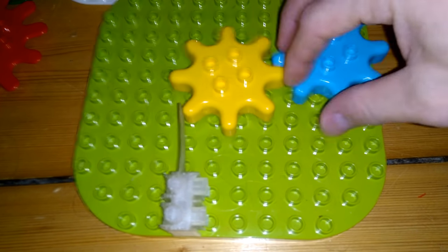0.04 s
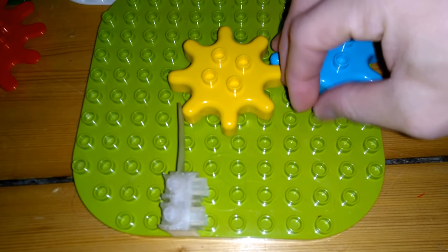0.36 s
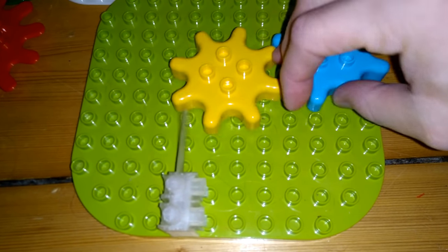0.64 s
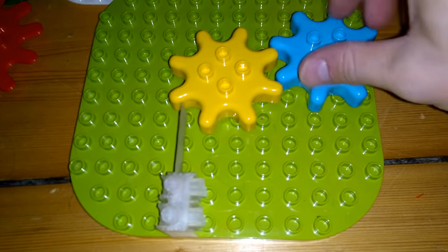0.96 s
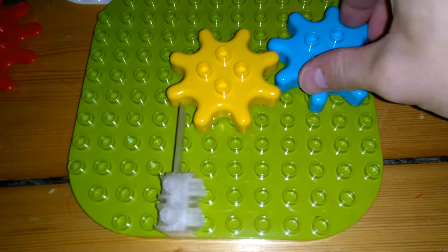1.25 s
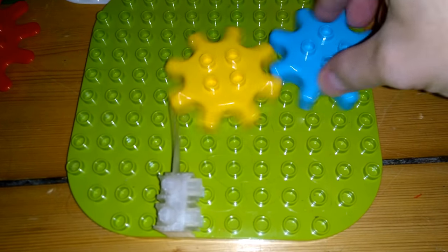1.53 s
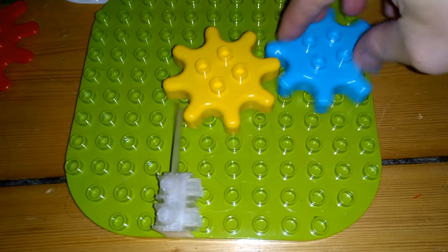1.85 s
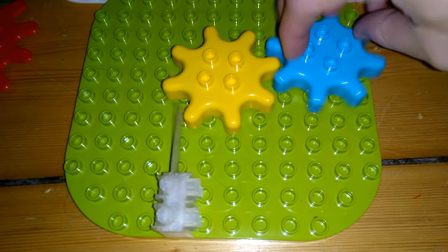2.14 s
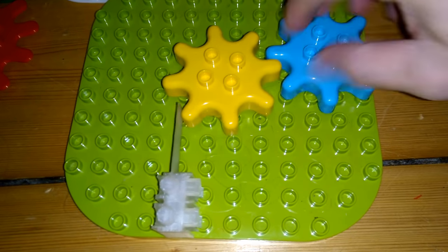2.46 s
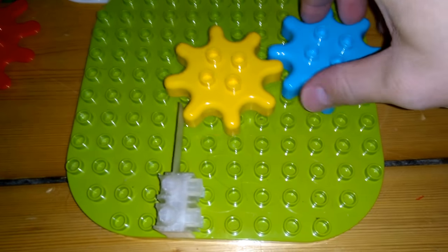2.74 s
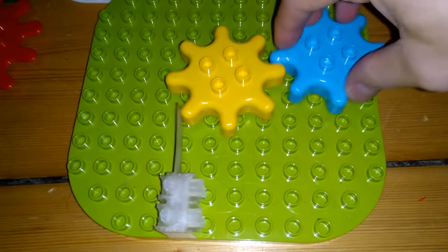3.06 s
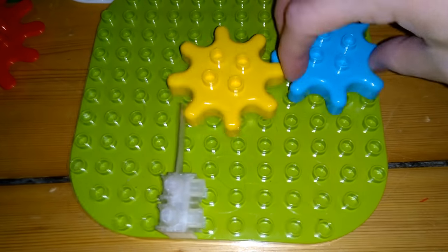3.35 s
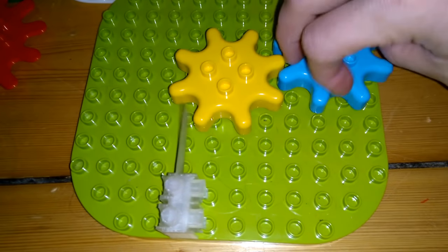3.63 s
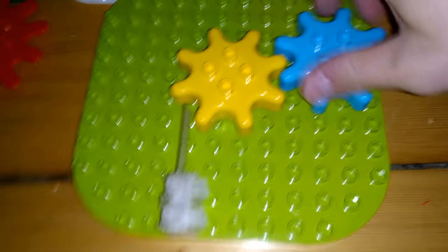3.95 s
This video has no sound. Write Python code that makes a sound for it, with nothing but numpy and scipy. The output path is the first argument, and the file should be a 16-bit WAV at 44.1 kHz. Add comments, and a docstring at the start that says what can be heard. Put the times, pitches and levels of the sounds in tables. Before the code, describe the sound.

Sharp clicks and clacks of hand-turned plastic gears, with a briefly buzzing plastic strip.

```python
"""A hand turns two hollow plastic toy gears on a base plate, close by in a small room.
At once three passing teeth each bend a thin plastic strip, which slips off and hums; each time the freed
gear clacks through its play in a burst of quick contacts. From 0.8 s fingers knock, tap and rub the
gears while loose teeth tick. Three more teeth pass from 1.6 s, the fingers knock again near 2.7 s,
and a last turn of three teeth starts at 3 s."""
import sys
import numpy as np
from scipy import signal
from scipy.fft import rfft, irfft, next_fast_len
from scipy.io import wavfile
from scipy.ndimage import uniform_filter1d, map_coordinates

SR = 44100
rng = np.random.default_rng(int(sys.argv[2]) if len(sys.argv) > 2 else 0)


def unload_wav(signal):
    """Save mono or channel-first audio to the path in sys.argv[1] as 16-bit WAV at rate SR, clipped to [-1, 1]."""
    wavfile.write(
        sys.argv[1],
        SR,
        np.round(np.clip(np.atleast_2d(signal).T, -1, 1) * 32767).astype(np.int16),
    )


N = 176400
T = np.arange(SR // 2) / SR  # time axis of one event [s]

# colour of the room tone: (frequency [Hz], level [dB])
ROOM_TONE_EQ = [(20, -38), (35, -5.5), (58, 4.5), (80, -2.5), (110, -1), (160, -4), (250, -5), (450, -17.5),
                (800, -13.5), (1200, -20), (3000, -22), (6000, -24.5), (10000, -25), (15500, -25),
                (17000, -27)]
# reverb decay: (frequency [Hz], t60 [s])
REVERB_T60 = [(120, 0.56), (400, 0.37), (850, 0.32), (2000, 0.36), (6000, 0.34), (10000, 0.29),
              (16000, 0.21)]
# reverb colour: (frequency [Hz], level [dB])
REVERB_EQ = [(120, 0.5), (400, -7.5), (850, -10.5), (2000, -11), (4000, -13.5), (6000, -12.5), (9000, -12),
             (16000, -19)]
# stereo balance of the toy: (frequency [Hz], left over right [dB])
LEFT_OVER_RIGHT = [(100, -5), (300, -2.5), (700, 0.5), (1300, -1.5), (2000, -4), (4400, -9), (6200, -12),
                   (8000, -3), (12400, -4.5), (15000, -1.5)]
# stereo phase of the toy: (frequency [Hz], left lead [rad])
LEFT_PHASE_LEAD = [(100, 0), (850, 0.28), (2700, 1.12), (4000, 2.1), (6000, 2), (8000, 1.53), (12000, 1.1),
                   (16000, 1.6)]
# fingers rub the gear as they change grip: (time [s], length [s], level [dB])
FINGER_RUBS = [(0.598, 0.063, -61), (1.029, 0.024, -64), (1.236, 0.26, -71), (1.395, 0.46, -63),
               (2.094, .05, -54.5), (2.799, 0.58, -65), (3.553, 0.074, -58.5)]
# colour of skin on plastic: (frequency [Hz], level [dB])
RUB_EQ = [(80, -11), (300, -0.5), (800, 3), (1300, -8), (3000, -13.5), (6000, -16), (10000, -31),
          (16000, -34.5)]
# fingers knock a gear on its peg: (time [s], level [dB], t60 [s])
PEG_KNOCKS = [(.795, -34, 0.11), (1.06, -40, 0.16), (1.081, -47, 0.19), (2.698, -37.5, 0.097),
              (2.778, -48.5, 0.1)]
# dull colour of a knock: (frequency [Hz], level [dB])
KNOCK_EQ = [(60, -14), (240, 1.5), (400, -6), (700, 6), (1200, -2.5), (3000, -8.5), (5000, -15.5),
            (6500, -24.5), (8000, -49.5), (16000, -53)]
# soft bumps of the plate: (time [s], level [dB])
PLATE_BUMPS = [(1.172, -44.5), (1.298, -68)]
# low thud of the plate: (frequency [Hz], level [dB])
BUMP_EQ = [(50, -26), (150, -9), (260, 3), (450, -19), (1500, -55), (8000, -43.5)]
# a finger catches a tooth: (time [s], level [dB], centre [Hz], width [Hz], t60 [s])
FINGER_TAPS = [(1.059, -30, 2900, 1153, 0.031), (1.4621, -39, 4200, 696, .03),
               (2.663, -38, 3000, 260, 0.028)]
# loose teeth touch: (time [s], contact level [dB], hollow ring level [dB])
TOOTH_TICKS = [(.213, -46, -43), (.245, -35.5, -36), (.753, -47.5, -51), (1.104, -47.5, -43),
               (1.376, -45, -46.5), (1.461, -42, -59), (1.635, -32.5, -34), (1.692, -34, -31.5),
               (1.866, -28, -29), (1.937, -38.5, -26.5), (2.182, -39, -32.5), (2.664, -50.5, -47.5),
               (2.842, -42, -43.5), (3.103, -34.5, -57.5), (3.277, -38, -36.5), (3.575, -54, -54),
               (3.622, -27.5, -26)]
# darker tilt of a light contact: (frequency [Hz], gain [dB])
TICK_EQ = [(200, 11), (1500, 5), (3500, -3), (6500, -1.5), (9000, -7.5), (16000, -10)]
# the strip slips off a tooth: (time [s], tick level [dB], hollow ring level [dB], swing level [dB])
STRIP_SLIPS = [(0.0, -37.5, -35.5, -41.5), (.227, -33.5, -28.5, -38), (.657, -37, -30.5, -45.5),
               (1.611, -37, -28, -40.5), (1.844, -32, -24.5, -42.5), (2.158, -35, -24.5, -41),
               (3.016, -34.5, -22, -43), (3.262, -30.5, -27.5, -41), (3.606, -34, -25, -40)]
# colour of the strip rattling in its holder: (frequency [Hz], level [dB])
RATTLE_EQ = [(60, -6.5), (150, -1), (290, 4), (400, -9), (780, 10.5), (1100, -1.5), (1900, -5.5),
             (3500, -18), (6500, -18), (9000, -43), (16000, -40)]
# resonances of the hard plastic: (frequency [Hz], width [Hz], level [dB])
PLASTIC_MODES = [(1890, 54, 5.5), (2490, 123, 1.5), (3000, 360, -13.5), (3408, 100, -2.5), (3930, 690, 2),
                 (4868, 108, 8), (5445, 66, 5.5), (6110, 167, 9.5), (6730, 170, 3), (8010, 217, 1),
                 (9300, 250, -14.5), (11300, 220, -17), (10800, 170, -10.5), (12310, 380, -2.5),
                 (15300, 200, -10.5)]
# broad crack under those resonances: (frequency [Hz], level [dB])
CRACK_EQ = [(100, -20.5), (400, -15), (650, -3.5), (1300, -9.5), (3000, -12.5), (7000, -21), (10000, -22.5),
            (16000, -13.5)]
# high shelf of a clack: (frequency [Hz], share of its treble gain [0-1])
CLACK_SHELF = [(3000, 0.048), (11000, 0.95)]
# the gear chatters against its neighbour:
# (time [s], length [s], contact level [dB], treble gain [dB], hollow ring level [dB], hollow pitch [Hz])
GEAR_CLACKS = [(0.086, 0.0068, -16.5, 1, -29, 790), (0.328, .012, -19, 2, -25.5, 803),
               (.6575, 0.0066, -29.5, -12.5, -32.5, 874), (1.6996, 0.014, -17.5, 2.5, -32.5, 803),
               (1.885, 0.023, -24.5, -3.5, -31, 904), (1.947, 0.0172, -21.5, 6.5, -36.5, 874),
               (2.194, 0.01, -22, -2.5, -25, 903), (2.294, .026, -27, 1, -33, 856.4),
               (3.0447, 0.016, -13.5, 2, -22.5, 846.6), (3.371, 0.018, -20.5, 3.5, -27, 820)]

ROOM_TONE_DB, ROOM_HUM_DB, ROOM_HUM_HZ = -66, -70.5, 61
REVERB_STEP_S, LOW_CUT_HZ, TOP_HZ = .4, 46, 16400
TAP_SKIRT_DB, TAP_SOFT_HZ = -21, 7000  # broad noise under the resonance; the fingertip softens the top
STRIP_HZ, HUM_TRIM_DB, RATTLE_TRIM_DB = 152.5, -9.5, 1
SPOT_SCATTER_DB = 3  # each spot of the gear weights the resonances differently
CONTACT_GAP_S, FIRST_CONTACT_DB, BURST_FADE_DB_PER_S = .0047, -2, 61
SAME_SPOT = 0.47  # how alike the contacts of one burst ring, 0-1


def amp(db):
    return 10 ** (np.asarray(db) / 20)


def unit(x):
    return x / np.sqrt(np.mean(x ** 2) + 1e-20)


def along(points, hz):
    """Read a curve of (frequency [Hz], value) points on a log axis."""
    f, v = np.transpose(points)
    return np.interp(np.log(hz + 1), np.log(f + 1), v)


def fade(t60, t=T):
    """Exponential decay that starts at t = 0."""
    return np.exp(-np.log(1000) * np.maximum(t, 0) / t60)


def swell(rise, hold, t60):
    """Smooth attack, then an exponential release from time `hold`; all in seconds."""
    return np.sin(np.pi / 2 * np.minimum(T / rise, 1)) ** 2 * fade(t60, T - hold)


def add(out, start, x):
    """Mix x in at `start` seconds."""
    i = max(round(start * SR), 0)
    out[:, i:i + len(T)] += x[..., :N - i]


def filtered(x, response):
    """EQ x with a function of frequency."""
    n = x.shape[-1]
    size = next_fast_len(n + SR // 4)
    return irfft(rfft(x, size) * response(np.fft.rfftfreq(size, 1 / SR)), size)[..., :n]


def body(gain, size=4096):
    """Minimum-phase impulse response of energy 1, coloured by the gain curve."""
    cepstrum = irfft(np.log(np.maximum(gain(np.fft.rfftfreq(size, 1 / SR)), 1e-6)))
    cepstrum[1:size // 2] *= 2
    cepstrum[size // 2 + 1:] = 0
    response = irfft(np.exp(rfft(cepstrum)))
    return response / np.linalg.norm(response)


def excite(envelope, response, spread=0.3):
    """A rough contact force, partly alike on both sides, played through a body."""
    mid, side = rng.standard_normal((2, len(T)))
    force = envelope * unit(np.array([mid + spread * side, mid - spread * side]))
    return signal.fftconvolve(force, response[None], axes=1)[:, :len(T)]


def wavering(hz, rough, rate):
    """A mode whose level and phase wander through `rate` random points a second."""
    knots = rng.standard_normal((2, 1024))
    level, skew = [rough * map_coordinates(k, [T * rate], mode="wrap") for k in knots]
    phase = 2 * np.pi * hz * T
    return np.sqrt(2) * ((1 + level / 2) * np.sin(phase) + skew * np.cos(phase))


def narrow_bass(x):
    """Mid and side to stereo: the close microphones hear diffuse bass alike."""
    width = lambda hz: along([(100, 0.16), (700, 0.69), (1500, 1.0)], hz)
    mid = filtered(x[0], lambda hz: np.sqrt(1 - width(hz) ** 2 / 2))
    side = filtered(x[1], lambda hz: width(hz) / np.sqrt(2))
    return np.array([mid + side, mid - side])


def stereo_image(hz):
    """The two microphones hear the toy with different colour and phase."""
    gain = amp(np.outer([.5, -.5], along(LEFT_OVER_RIGHT, hz)))
    phase_turn = np.exp(np.outer([.5j, -.5j], along(LEFT_PHASE_LEAD, hz)))
    return gain / np.sqrt(np.mean(gain ** 2, axis=0)) * phase_turn


def room_tone():
    """A quiet bed of air with a faint low hum."""
    noise = narrow_bass(rng.standard_normal((2, N)))
    air = unit(filtered(noise, lambda hz: amp(along(ROOM_TONE_EQ, hz))))
    hum = np.sin(2 * np.pi * ROOM_HUM_HZ * np.arange(N) / SR)
    return amp(ROOM_TONE_DB) * air + amp(ROOM_HUM_DB) * hum


def reverb_tail():
    """Diffuse stereo tail of a small room; the bass lingers longest."""
    hz, t, spectrum = signal.stft(rng.standard_normal((2, len(T))), SR, nperseg=256)
    t60 = along(REVERB_T60, hz)[:, None]
    decay = fade(t60, t) * np.sqrt(2 * np.log(1000) / (t60 * SR))  # equal energy for any t60
    colour = amp(along(REVERB_EQ, hz))[:, None]
    tail = signal.istft(spectrum * decay * colour, SR, nperseg=256)[1][:, :len(T)]
    return narrow_bass(tail * np.minimum(T / 0.0039, 1))


def reverb(x):
    """Smooth small-room reverb: overlapping windows each get a fresh tail, so no fixed pitches ring."""
    step = round(REVERB_STEP_S * SR)
    window = np.sqrt(np.hanning(2 * step))
    padded = np.pad(x, ((0, 0), (step, 2 * step)))
    out = np.zeros((2, N + 3 * step + len(T)))
    for i in range(0, N + 1, step):
        wet = signal.fftconvolve(padded[:, i:i + 2 * step] * window, reverb_tail(), axes=1)
        out[:, i:i + wet.shape[1]] += wet
    return out[:, step:step + N]


def finger_rubs():
    """Faint friction of skin on plastic under an uneven grip."""
    out = np.zeros((2, N))
    gear = body(lambda hz: amp(along(RUB_EQ, hz)))
    for start, length, db in FINGER_RUBS:
        drift = unit(uniform_filter1d(rng.standard_normal(len(T)), size=600))
        grip = unit(amp(2.4 * drift))
        add(out, start, amp(db) * excite(swell(rise=0.022, hold=length, t60=0.11) * grip, gear))
    return out


def knocks_and_bumps():
    """A gear knocks on its peg with a snap and a dull decay; the plate thuds softly."""
    out = np.zeros((2, N))
    peg = body(lambda hz: amp(along(KNOCK_EQ, hz)))
    plate = body(lambda hz: amp(along(BUMP_EQ, hz)))
    for start, db, t60 in PEG_KNOCKS:
        snap = 1.2 * fade(t60=.0025)
        add(out, start, amp(db) * excite(fade(t60) + snap, peg))
    for start, db in PLATE_BUMPS:
        add(out, start, amp(db) * excite(swell(rise=0.0013, hold=0.002, t60=0.035), plate))
    return out


def resonance(hz, centre, width):
    """Power curve of one mode, 1 at its centre."""
    return 1 / (1 + ((hz ** 2 - centre ** 2) / (width * hz + 1)) ** 2)


def finger_taps():
    """A fingertip catches a tooth: a dry tap with one broad resonance."""
    out = np.zeros((2, N))
    for start, db, centre, width, t60 in FINGER_TAPS:
        power = lambda hz: resonance(hz, centre, width) + amp(TAP_SKIRT_DB) ** 2
        tooth = body(lambda hz: np.sqrt(power(hz) / (1 + (hz / TAP_SOFT_HZ) ** 8)))
        add(out, start, amp(db) * excite(fade(t60), tooth))
    return out


def plastic(hz):
    """Gain of the gear struck at a random spot: resonances on a broad crack."""
    spot_db = SPOT_SCATTER_DB * rng.uniform(-1, 1, len(PLASTIC_MODES))
    peaks = sum(amp(db + extra) ** 2 * resonance(hz, centre, width)
                for (centre, width, db), extra in zip(PLASTIC_MODES, spot_db))
    return np.sqrt(peaks + amp(along(CRACK_EQ, hz)) ** 2)


def hollow(hz, hold):
    """The air under the gear rings up and dies quickly."""
    return swell(rise=0.011, hold=hold, t60=.035) * wavering(hz, rough=0.85, rate=291)


def tick():
    """One light contact rings the plastic with a softened top."""
    gear = body(lambda hz: plastic(hz) * amp(along(TICK_EQ, hz)))
    return excite(swell(rise=0.0015, hold=.002, t60=.025), gear)


def loose_teeth():
    """Loose teeth touch, each tick stirring the gear's hollow."""
    out = np.zeros((2, N))
    for start, db, hollow_db in TOOTH_TICKS:
        add(out, start, amp(db) * tick() + amp(hollow_db) * hollow(hz=820, hold=0.0054))
    return out


def strip_slips():
    """The strip's tip leaves a tooth: a tick and a short, clean ring of the hollow."""
    out = np.zeros((2, N))
    for start, db, hollow_db, _ in STRIP_SLIPS:
        ring = swell(rise=.0075, hold=.0075, t60=0.022) * wavering(hz=872, rough=0.12, rate=440)
        add(out, start, amp(db) * tick() + amp(hollow_db) * ring)
    return out


def strip_hum():
    """The freed strip hums and rattles in its holder, the rattle pulsing once a swing."""
    out = np.zeros((2, N))
    holder = body(lambda hz: amp(along(RATTLE_EQ, hz)))
    pulses = unit(np.exp(0.27 * np.cos(2 * np.pi * STRIP_HZ * T)))
    for start, _, _, swing_db in STRIP_SLIPS:
        hum = swell(rise=0.042, hold=0.076, t60=0.17) * wavering(STRIP_HZ, rough=0.1, rate=44)
        rattle = excite(swell(rise=0.0021, hold=0.014, t60=0.34) * pulses, holder)
        add(out, start, amp(swing_db) * (amp(HUM_TRIM_DB) * hum + amp(RATTLE_TRIM_DB) * rattle))
    return out


def gear_clacks():
    """Bursts of quick, uneven contacts ring the same spot of the gear and pump its hollow."""
    out = np.zeros((2, N))
    contact = swell(rise=.001, hold=.001, t60=0.029)
    k = np.arange(8)  # contact number within a burst
    for start, length, db, treble_db, hollow_db, hollow_hz in GEAR_CLACKS:
        gear = body(lambda hz: plastic(hz) * amp(treble_db * along(CLACK_SHELF, hz)))
        shared_ring = SAME_SPOT * excite(contact, gear)
        delays = CONTACT_GAP_S * (k + (k > 0) * rng.uniform(-0.17, .15, len(k)))
        gate = np.clip(length / CONTACT_GAP_S - k + .5, 0, 1)  # closes at the end of the burst
        strengths = gate * amp(db + FIRST_CONTACT_DB * (k == 0) - BURST_FADE_DB_PER_S * delays)
        for strength, delay in zip(strengths, delays):
            if strength > 0:
                own_ring = np.sqrt(1 - SAME_SPOT ** 2) * excite(contact, gear)
                add(out, start + delay, strength * (shared_ring + own_ring))
        add(out, start, amp(hollow_db) * hollow(hollow_hz, hold=length))
    return out


def scene():
    """The toy and its reverb, placed in stereo over the room tone."""
    toy = gear_clacks() + loose_teeth() + strip_slips() + finger_taps() + strip_hum()
    toy += knocks_and_bumps() + finger_rubs()
    return filtered(toy + reverb(toy), stereo_image) + room_tone()


def record(dry):
    """The microphones drop the deepest bass and keep nothing above their band limit."""
    lean = filtered(dry, lambda hz: hz ** 2 / np.hypot(hz ** 2, LOW_CUT_HZ ** 2))
    return filtered(lean, lambda hz: np.clip((TOP_HZ - hz) / 700 + .5, 0, 1) ** 2)


dry = scene()
out = record(dry)
unload_wav(out)
```